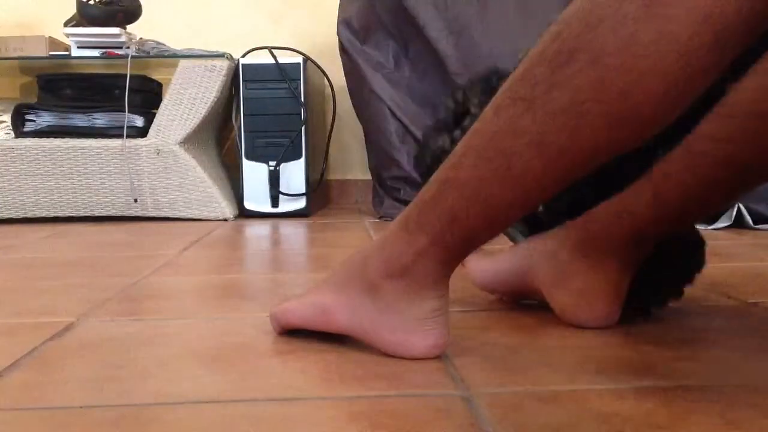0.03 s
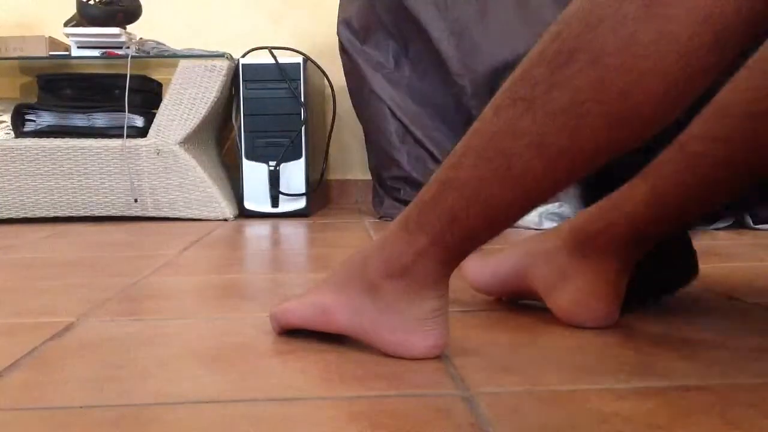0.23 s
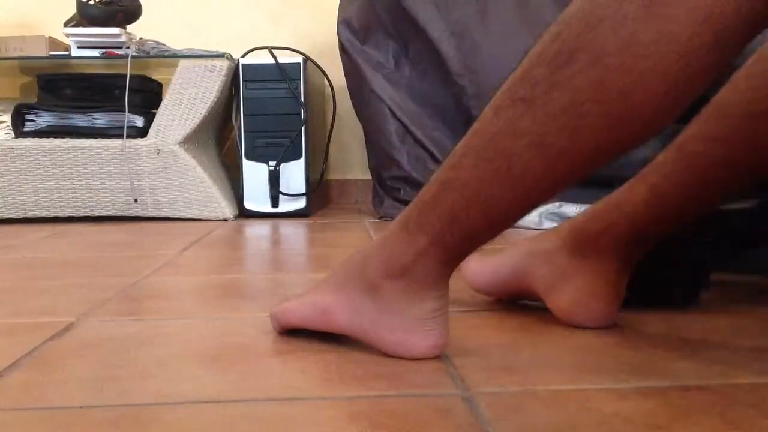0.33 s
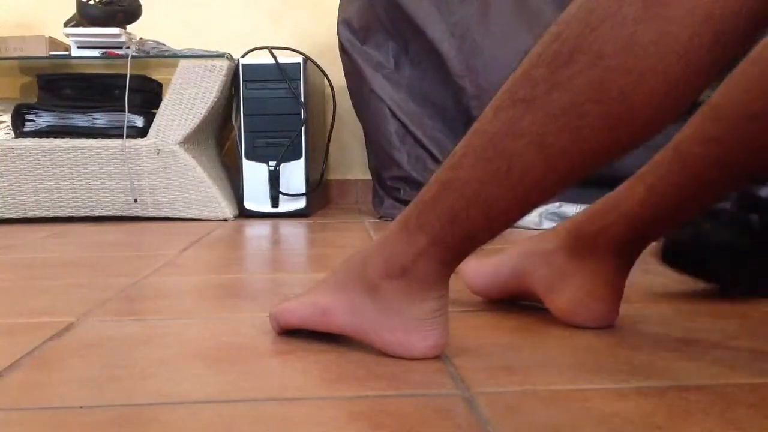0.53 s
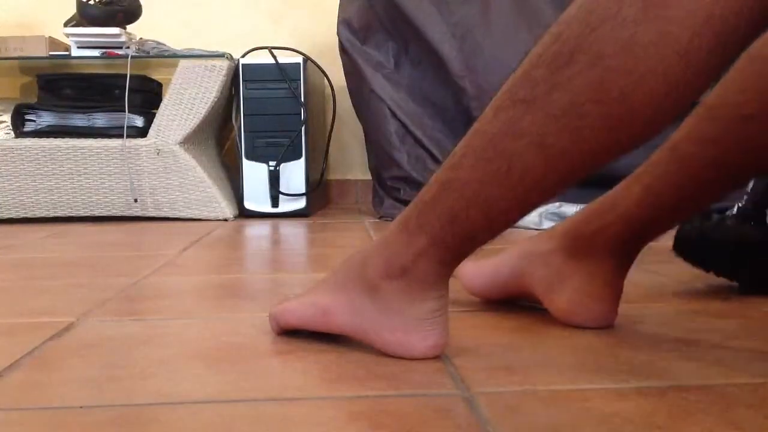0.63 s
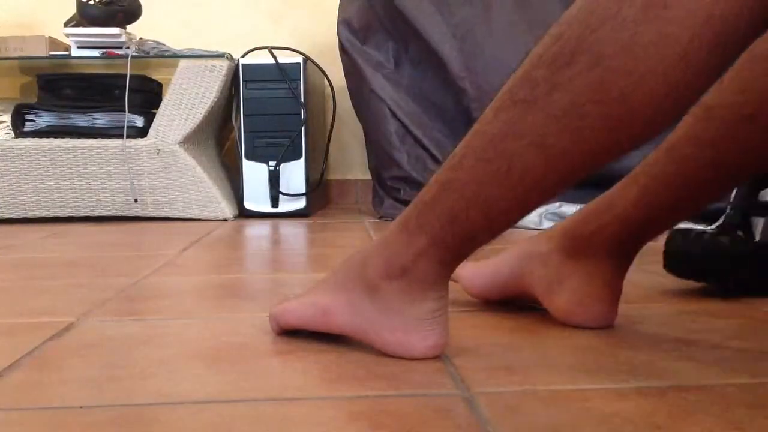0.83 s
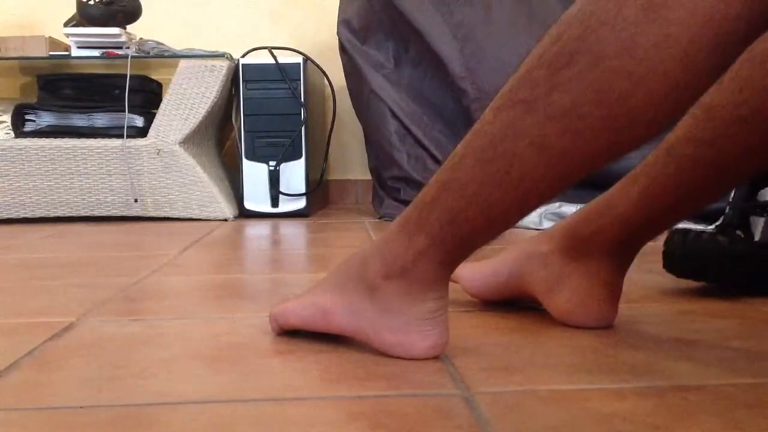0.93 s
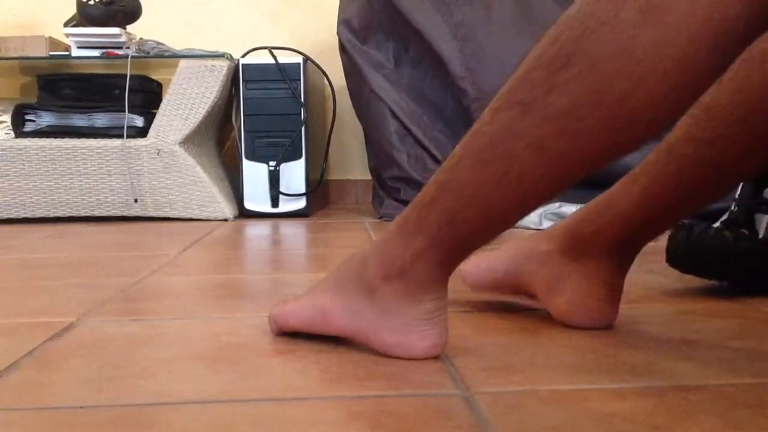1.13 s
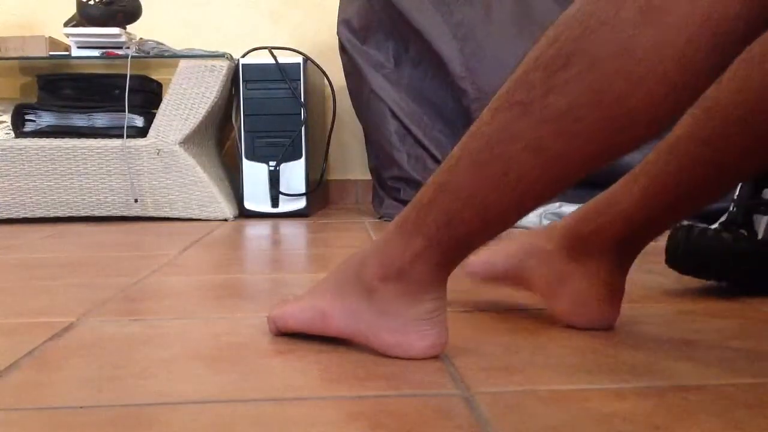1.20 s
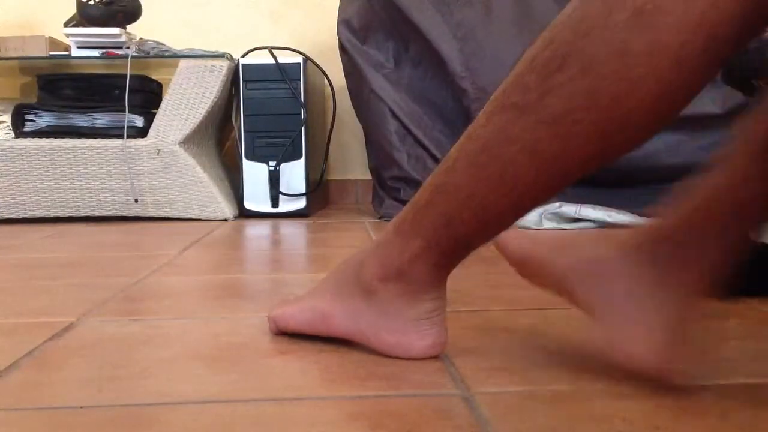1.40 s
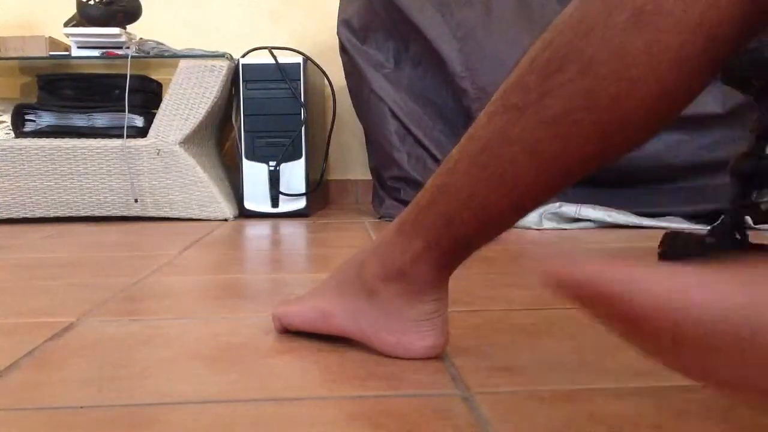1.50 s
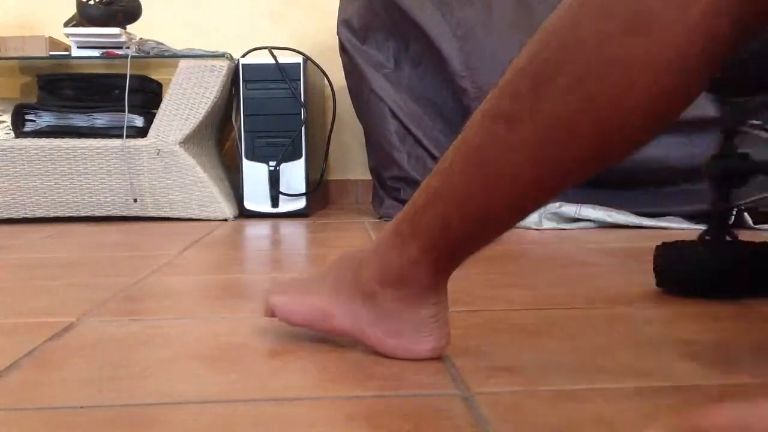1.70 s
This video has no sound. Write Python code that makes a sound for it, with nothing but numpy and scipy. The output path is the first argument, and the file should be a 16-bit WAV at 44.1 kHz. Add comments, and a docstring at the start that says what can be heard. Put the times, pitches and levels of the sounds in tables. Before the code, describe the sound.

A heavy boot knocks once on a tiled floor. First come soft thuds, small ticks and a dull hollow pop at 0.2 seconds as it slips off. The sharp knock lands at about 0.4 seconds and echoes briefly through the room. From 1.2 to 1.7 seconds, bare heels thud softly, with faint clicks and a rustle of cloth and skin over low room noise.

```python
"""A boot set down on tile

A heavy boot is pulled off in a bare, echoing room, and its hollow pops as the heel comes free. The edge of the
sole cracks on the tile, then the rest slaps down in a quick cluster of knocks, coloured by ringing pitches.
Bare heels thud softly, small fittings tick, the sole scuffs once, and friction of cloth and skin makes a rustle
over quiet room noise."""
import sys
import numpy as np
from scipy import signal
from scipy.fft import rfft, irfft
from scipy.io import wavfile
from scipy.ndimage import uniform_filter1d

SR = 44100
rng = np.random.default_rng(int(sys.argv[2]) if len(sys.argv) > 2 else 0)


def to_wav(sig):
    """Store sig (one row per channel, or 1-D mono) as 16-bit WAV at the path in sys.argv[1].

    Samples outside -1..1 are clipped; the rate is SR.
    """
    pcm = np.clip(np.atleast_2d(sig), -1, 1) * 32767
    pcm = np.round(pcm).astype(np.int16)
    wavfile.write(sys.argv[1], SR, pcm.T)  # frames by channels


N = 77175


def amp(db):
    """Amplitude ratio of a level in decibels."""
    return 10 ** (np.asarray(db) / 20)


def unit_rms(x):
    """Normalisation to a mean power of one."""
    return x / np.sqrt(np.mean(x ** 2) + 1e-20)


def curve_at(points, hz):
    """Interpolation on a logarithmic frequency axis."""
    f, value = np.transpose(points)
    return np.interp(np.log(hz + 1), np.log(f + 1), value)


def add(mix, start_s, sound):
    """Superposition: a sound sums into the mix from its start time."""
    part = mix[max(round(start_s * SR), 0):][:len(sound)]
    part += sound[:len(part)]


def decay(t, t60):
    """Exponential damping: 60 dB are lost in t60 seconds."""
    return np.exp(-np.log(1000) * t / t60)


def ring(tones, t):
    """Damped oscillation: a sum of dying cosines, one for each pitch."""
    return sum(amp(db) * decay(t, t60) * np.cos(2 * np.pi * hz * t) for hz, db, t60 in tones)


def filtered(x, kind, hz):
    """Second-order filtering: 12 dB per octave beyond the cutoff."""
    return signal.sosfilt(signal.butter(2, hz, kind, fs=SR, output="sos"), x)


def noise(spectrum):
    """Random phases under a given spectrum make steady noise of unit rms."""
    hz = np.fft.rfftfreq(N, 1 / SR)
    phases = np.exp(2j * np.pi * rng.random(len(hz)))
    return unit_rms(irfft(amp(curve_at(spectrum, hz)) * phases, N))


def coloured(x, db_at, bins):
    """Spectral shaping at constant energy: x is whitened, then weighted by db_at(hz)."""
    spectrum = rfft(x, 2 * len(x))
    hz = np.fft.rfftfreq(2 * len(x), 1 / SR)
    local_power = abs(uniform_filter1d(abs(spectrum) ** 2, bins))
    white = spectrum / np.sqrt(local_power + 1e-12)
    shaped = irfft(white * amp(db_at(hz)))[:len(x)]
    return unit_rms(shaped) * np.sqrt(np.mean(x ** 2))


# Spectrum of the room noise: frequency_hz, relative_density_db
AIR_SPECTRUM = [(25, -28), (60, -10.5), (115, 1), (170, -1), (270, -0.5), (480, -8.5), (800, -15.5),
                (1500, -22), (2800, -20.5), (5000, -30), (8000, -32), (15000, -32)]


def room_noise():
    """Stationary noise, with most of its power at low frequencies."""
    return amp(-47.5) * noise(AIR_SPECTRUM)


# Envelopes of the friction: time_s, rub_db, hiss_db
RUSTLE_ENVELOPES = [(0, -48, -51), (.08, -45.5, -53.5), (.16, -44.5, -55), (.24, -40, -54.5),
                    (.33, -44, -49), (.45, -45, -44), (.75, -65, -81), (.98, -57, -69), (1.15, -68, -71),
                    (1.29, -56, -63), (1.35, -49.5, -55), (1.45, -50, -59), (1.55, -50, -63),
                    (1.65, -53, -71), (1.705, -53.5, -55.5), (1.75, -54, -73)]
# Spectrum of the low rub: frequency_hz, relative_density_db
RUB_SPECTRUM = [(40, -25), (130, -4.5), (450, 6.5), (1100, -4), (3000, -12.5), (6000, -28), (15000, -53)]
# Spectrum of the fine hiss: frequency_hz, relative_density_db
HISS_SPECTRUM = [(500, -37), (2500, -8), (6000, 1), (11000, -2), (15000, -4)]


def cloth_rustle():
    """Friction of cloth and skin comes in small grains, which modulate a rub and a hiss alike."""
    out, t = np.zeros(N), np.arange(N) / SR
    time_s, rub_db, hiss_db = np.transpose(RUSTLE_ENVELOPES)
    grain_db = 1.5 * unit_rms(uniform_filter1d(rng.standard_normal(N), size=120))
    for level_db, spectrum in [(rub_db, RUB_SPECTRUM), (hiss_db, HISS_SPECTRUM)]:
        envelope = amp(np.interp(t, time_s, level_db))
        out += envelope * unit_rms(amp(grain_db) * noise(spectrum))
    return out


# Light contacts, mostly ticks of the boot's fittings and one scuff of the sole: start_s, level_db, centre_hz,
# width_octaves, t60_s
LIGHT_TICKS = [(0.0161, -42, 1900, 0.77, 0.05), (0.0227, -31.5, 4800, 1.7, 0.013),
               (0.0229, -30, 2380, 0.34, 0.021), (0.144, -41, 6240, 2.2, 0.021),
               (0.342, -29.5, 1390, 1.04, 0.049), (0.8654, -43.5, 9230, 1.1, 0.027),
               (.886, -56, 9000, .7, 0.023), (0.9, -49.5, 10000, .4, 0.022), (1.252, -50, 7240, 2, 0.025),
               (1.336, -34, 3060, 1.2, 0.02), (1.3364, -30.5, 1070, .3, 0.016),
               (1.339, -39.5, 658, 0.23, .05), (1.3426, -49, 7750, 0.46, 0.029),
               (1.358, -46.5, 2400, 0.77, 0.1), (1.368, -44.5, 3500, 1.6, 0.034),
               (1.423, -48, 10100, 0.84, 0.016), (1.653, -49, 8000, .9, 0.0098)]


def light_ticks(skirt_db=-33):
    """Light impacts: each is a quickly damped band of noise about one centre frequency."""
    out, t = np.zeros(N), np.arange(SR // 20) / SR
    for start_s, level_db, centre_hz, width_octaves, t60 in LIGHT_TICKS:
        def band_db(hz):
            octaves = np.log2((hz + 1) / centre_hz)
            return skirt_db * (1 - np.exp(-0.5 * (octaves / width_octaves) ** 2))
        burst = decay(t, t60) * rng.standard_normal(len(t))
        add(out, start_s, amp(level_db) * coloured(burst, band_db, bins=50))
    return out


# Pushes of heel and boot on the floor: start_s, level_db, pitch_hz, length_s
HEEL_THUDS = [(.0225, -23.5, 213, 0.0061), (.068, -31, 116, 0.011), (.104, -21.5, 148.6, .016),
              (.139, -31.5, 152, 0.012), (.187, -26, 146, 0.016), (.368, -51, 65, 0.0043),
              (.374, -27, 163.7, 0.028), (1.172, -25, 238, 0.019), (1.186, -30.5, 158, 0.025),
              (1.215, -26, 189, 0.022), (1.275, -39.5, 168.2, 0.081), (1.308, -32.5, 166, 0.027),
              (1.56, -51, 128, 0.024), (1.69, -38, 124, 0.024), (1.738, -31, 137, 0.006)]


def heel_thuds():
    """A soft impact spreads its force over time, giving a low pulse that swells and dies."""
    out = np.zeros(N)
    for start_s, level_db, pitch_hz, length_s in HEEL_THUDS:
        t = np.arange(0, length_s, 1 / SR)
        swell = np.sin(np.pi * (t / length_s) ** 0.69)
        add(out, start_s, amp(level_db) * swell * np.sin(2 * np.pi * pitch_hz * t))
    return out


# Modes of the boot's hollow: pitch_hz, level_db, t60_s
CAVITY_MODES = [(207, -32.5, 0.24), (271, -20, 0.043), (409, -23.5, 0.048), (514.6, -23, .1),
                (561, -28.5, 0.15), (691, -27, 0.044), (1115, -30, 0.034), (1336, -30, 0.041),
                (1637, -36, 0.052), (2240, -36, 0.033)]


def cavity_pop(start_s=0.1995):
    """Cavity resonance: the hollow rings, dull and low, as the heel leaves the boot."""
    out, t = np.zeros(N), np.arange(SR // 4) / SR
    # Neighbouring modes start in opposite phase, which softens the onset.
    hollow = ring(CAVITY_MODES[::2], t) - ring(CAVITY_MODES[1::2], t)
    add(out, start_s, filtered(hollow, "lowpass", 2270))
    return out


# Impacts of sole on tile: start_s, body_gain_db, crack_gain_db, low_cutoff_hz, high_cutoff_hz
SOLE_IMPACTS = [(0.2552, -37.5, -53, 280, 2140), (0.2846, -41, -35, 270, 2800),
                (.3547, -14.5, -7.5, 576, 10800), (0.3646, -24.5, -15.5, 283, 12000),
                (0.3678, -18, -20.5, 288, 14000), (0.3709, -14.5, -13.5, 268, 8300),
                (0.3732, -14.5, -13, 287, 6640), (0.3759, -15, -5.5, 960, 3760),
                (.3765, -14, -12.5, 284, 4340), (0.382, -24, -32, 278, 13000)]
# Ringing pitches that colour the sole's clustered knocks: pitch_hz, relative_level_db, t60_s
KNOCK_PITCHES = [(287.5, -4, 0.1), (367, -18.5, 0.14), (493.7, -18, 0.18), (631, -6, 0.034),
                 (689, -13, 0.091), (810, -19, 0.058), (975, -17, 0.09), (1145, -17, 0.11),
                 (1596, -22.5, 0.033), (2700, -13, 0.0047)]
# Spectrum of the crack: frequency_hz, relative_level_db
CRACK_SPECTRUM = [(30, -40), (150, -25), (400, 13), (1050, 4.5), (1900, -17), (2500, 6), (3200, -10.5),
                  (4700, -3), (6200, -5), (6900, -2.5), (7900, 1.5), (8700, -4.5), (11300, -2.5),
                  (15500, -7)]


def sole_knocks(pitch_spread=0.023, contact_q=1.76, soft_hz=2840, snap_s=0.00049):
    """Impact excitation: each contact cracks and rings briefly; its place sets the deepest pitch."""
    out, t = np.zeros(N), np.arange(SR // 4) / SR
    crack_envelope = decay(t, t60=0.021) + amp(7.5) * np.exp(-t / snap_s)
    for start_s, body_db, crack_db, low_hz, high_hz in SOLE_IMPACTS:
        tones = [(hz * (1 + pitch_spread * rng.standard_normal()), db, t60)
                 for hz, db, t60 in KNOCK_PITCHES]
        omega = 2 * np.pi * low_hz
        resonant_highpass = signal.bilinear([1, 0, 0], [1, omega / contact_q, omega ** 2], SR)
        body = filtered(ring(tones, t), "lowpass", soft_hz)
        body = signal.lfilter(*resonant_highpass, body)
        body = filtered(body, "lowpass", high_hz)

        def colour_db(hz):
            return curve_at(CRACK_SPECTRUM, hz) - 10 * np.log10(1 + (hz / high_hz) ** 4)
        crack = coloured(crack_envelope * rng.standard_normal(len(t)), colour_db, bins=300)
        add(out, start_s, amp(body_db) * body + amp(crack_db) * crack / 2)
    return out


# Reverberation time of the room: frequency_hz, t60_s
TAIL_DECAY = [(100, 1), (250, 0.86), (600, 1), (1500, 0.82), (3000, 0.94), (7000, 0.85), (11000, 0.64),
              (15000, 0.55)]
# Spectrum of the reverberation: frequency_hz, relative_level_db
TAIL_SPECTRUM = [(25, -33), (70, -23), (150, 7), (240, -0.5), (420, 1), (650, 1), (1200, -2.5), (1900, 5),
                 (2500, -6.5), (3200, 1.5), (8000, -5.5), (15000, -1.5)]


def diffuse_tail(build_s=0.0027, energy_db=-3.5):
    """Diffuse field: reflections from hard walls merge into a tail whose treble dies first."""
    band_hz, frame_s, bands = signal.stft(rng.standard_normal(SR), SR, nperseg=256)
    damping = decay(frame_s, curve_at(TAIL_DECAY, band_hz)[:, None])
    tail = signal.istft(bands * damping, SR, nperseg=256)[1][:SR]
    build_up = 1 - np.exp(-np.arange(SR) / SR / build_s)
    tail = coloured(tail * build_up, lambda hz: curve_at(TAIL_SPECTRUM, hz), bins=120)
    return amp(energy_db) * tail / np.linalg.norm(tail)


# Modes of the room: pitch_hz, gain_db, t60_s
STANDING_WAVES = [(229.9, -52.5, 0.81), (291, -52, 0.27), (534, -67, 0.88), (635.4, -60, 0.94),
                  (651, -56.5, 0.45), (717, -61, 0.84)]
# Echoes from near walls and furniture: delay_s, gain_db
EARLY_REFLECTIONS = [(.0145, -20), (0.022, -16.5), (0.028, -22), (.083, -55), (.115, -28)]


def reverberation(x, crossover_hz=1300, scatter_period_s=0.011):
    """Convolution with the room's response: standing waves, distinct echoes and diffuse tails."""
    fixed_paths = ring(STANDING_WAVES, np.arange(SR) / SR)
    for delay_s, gain_db in EARLY_REFLECTIONS:
        add(fixed_paths, delay_s, amp([gain_db]))
    bass = filtered(x, "lowpass", crossover_hz)
    treble = filtered(x, "highpass", crossover_hz)
    # The treble alternates between two tails, so each contact scatters by other paths.
    turn = np.pi * np.arange(N) / SR / scatter_period_s
    feeds = [(x, fixed_paths), (bass, diffuse_tail()),
             (treble * np.cos(turn), diffuse_tail()), (treble * np.sin(turn), diffuse_tail())]
    return sum(signal.fftconvolve(feed, response)[:N] for feed, response in feeds)


def scene():
    """Direct and reflected sound superpose, alike in both channels."""
    knocks, pop, thuds, ticks = sole_knocks(), cavity_pop(), heel_thuds(), light_ticks()
    direct = knocks + pop + thuds + ticks
    reflected = reverberation(amp(-3) * knocks + amp(-3.5) * (pop + ticks) + amp(-9.5) * thuds)
    return np.tile(direct + reflected + cloth_rustle() + room_noise(), (2, 1))


def record(dry):
    """Band limiting: a small microphone loses the deep bass, and the highest treble is cut off."""
    thin = filtered(dry, "highpass", 85)
    treble_cut = signal.firwin(511, 15400, window=("kaiser", 9), fs=SR)
    return signal.oaconvolve(thin, treble_cut[None], "same")


dry = scene()
out = record(dry)
to_wav(out)
```